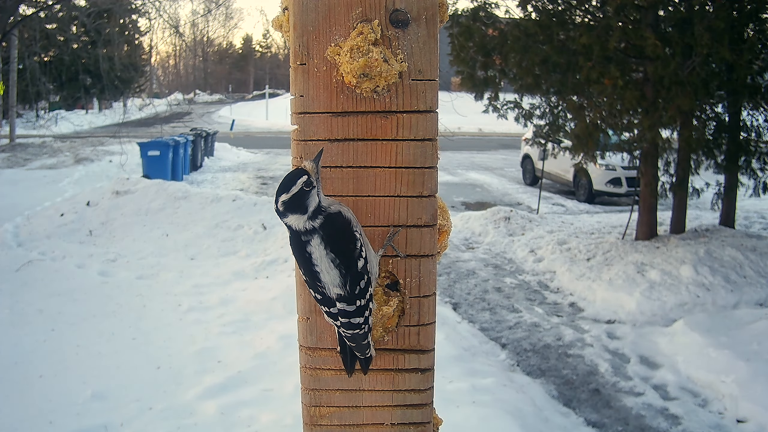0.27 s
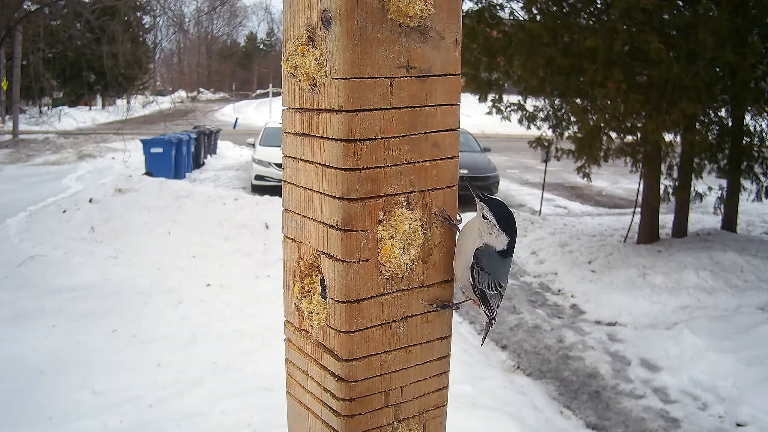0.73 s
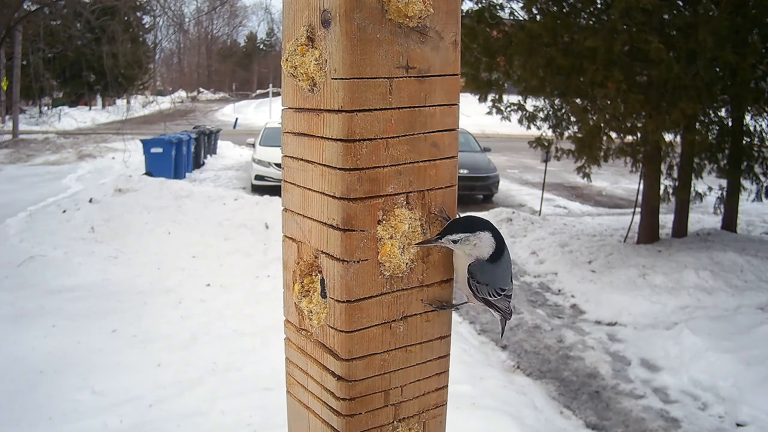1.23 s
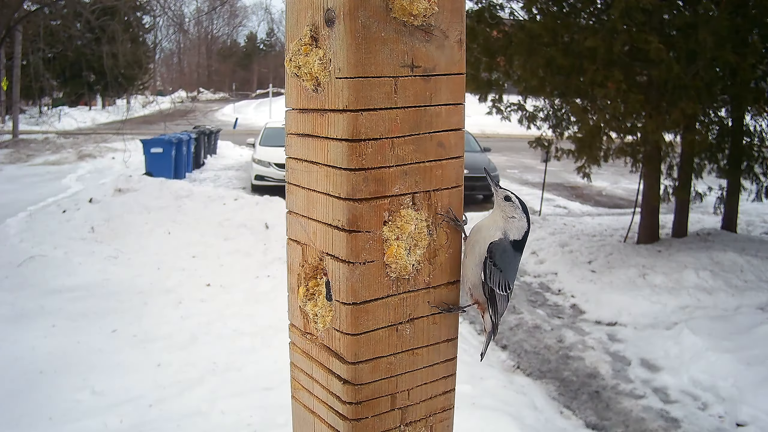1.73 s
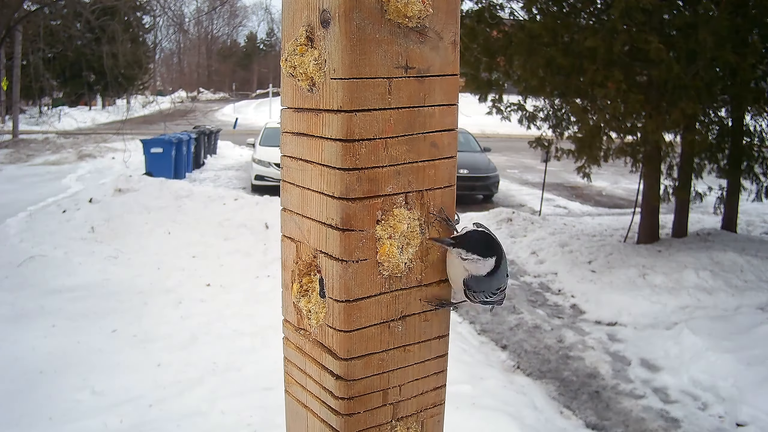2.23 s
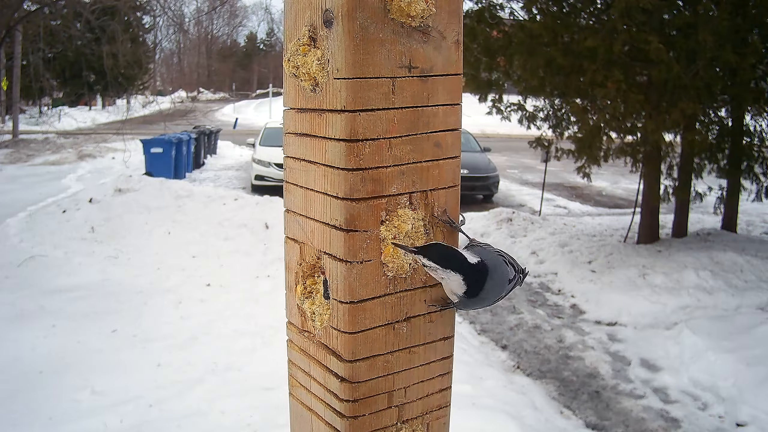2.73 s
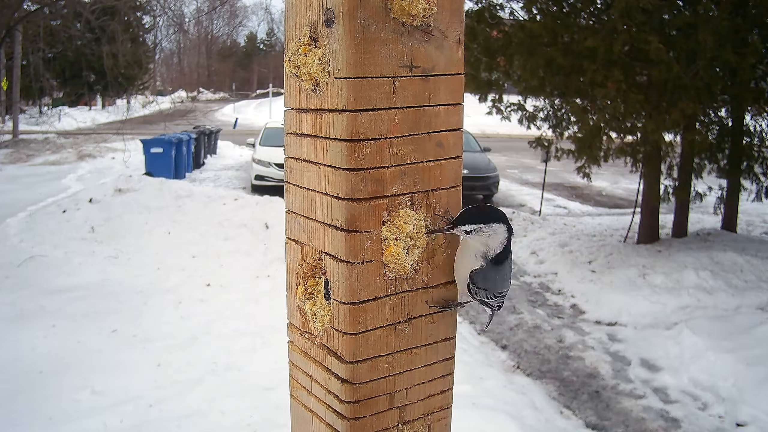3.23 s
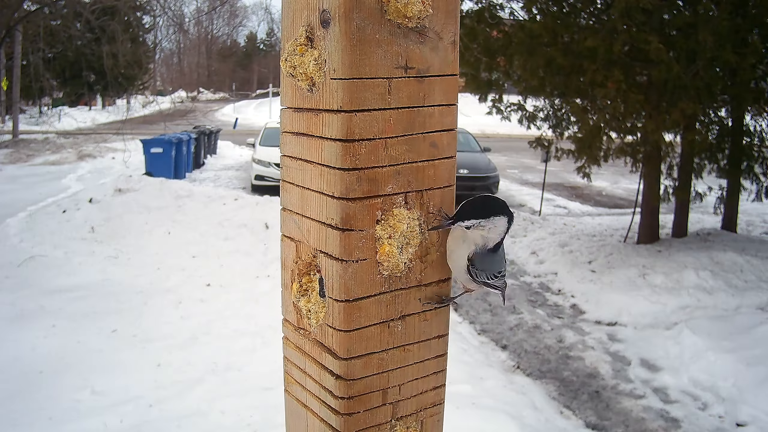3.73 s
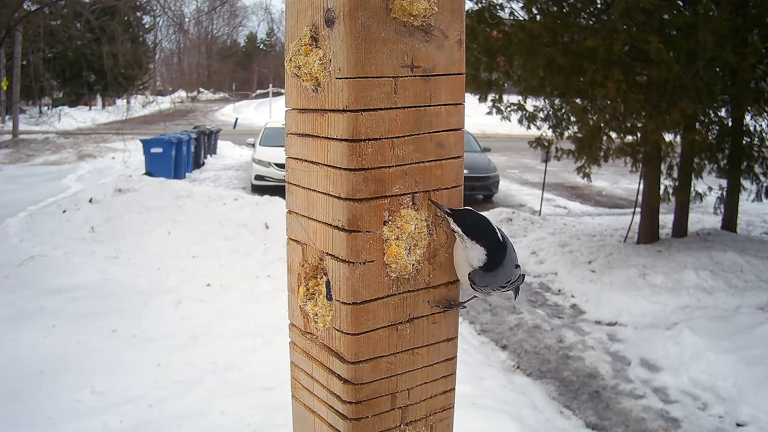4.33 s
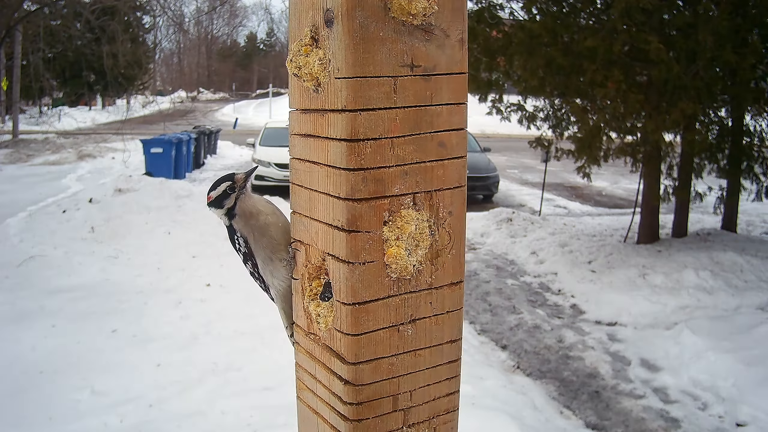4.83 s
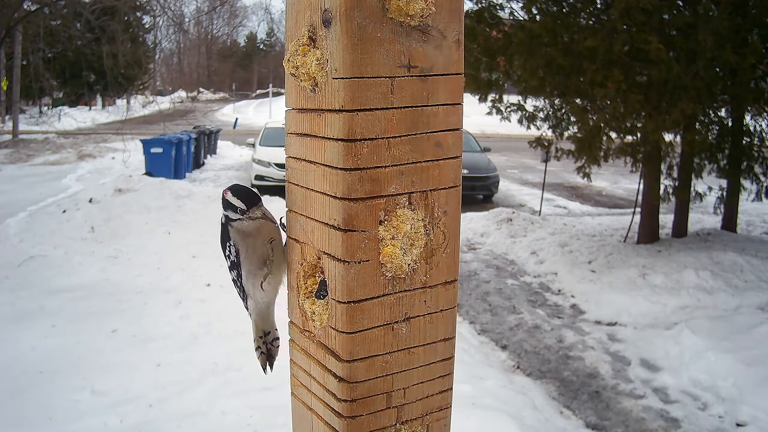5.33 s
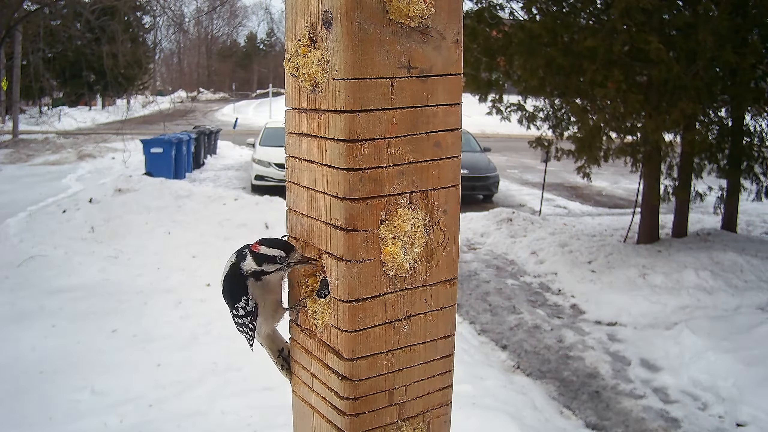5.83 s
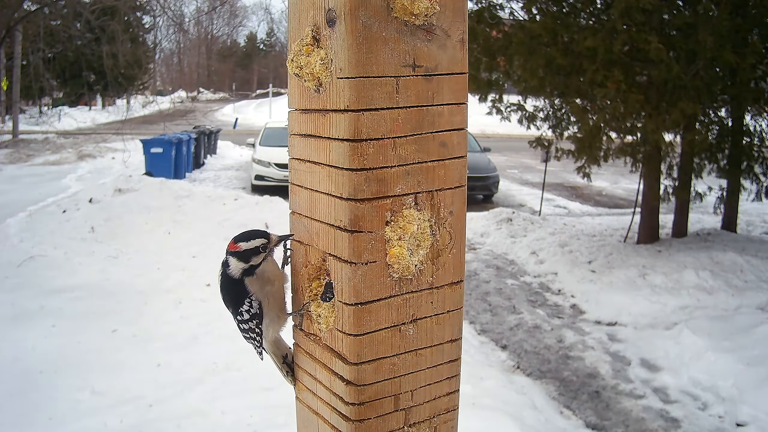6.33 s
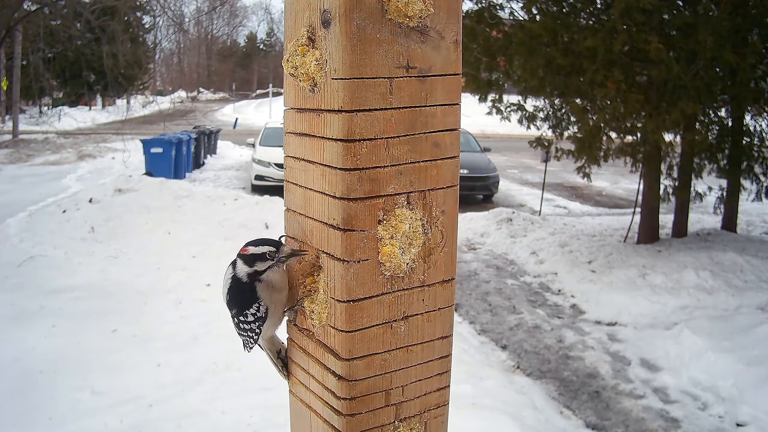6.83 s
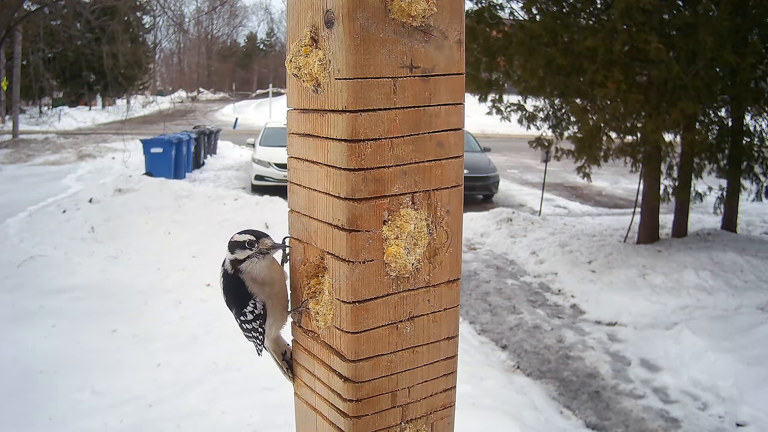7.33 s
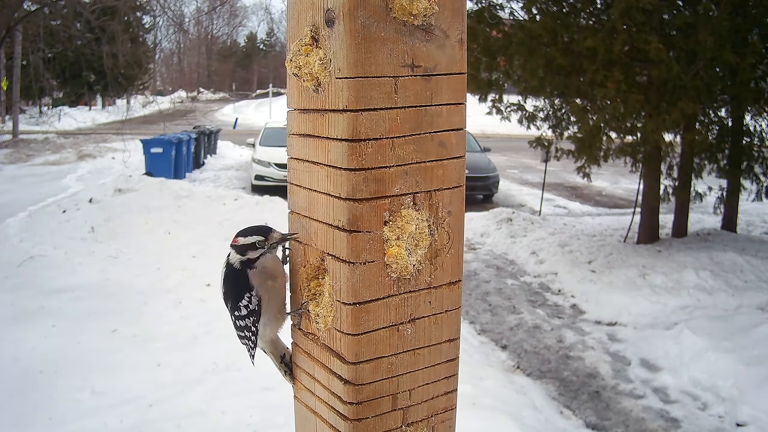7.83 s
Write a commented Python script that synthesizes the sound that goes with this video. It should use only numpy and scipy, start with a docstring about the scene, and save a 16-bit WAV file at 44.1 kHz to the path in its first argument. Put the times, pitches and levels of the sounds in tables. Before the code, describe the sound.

A small bird feeds at a wooden post in a yard, heard close up against an even background hiss. High chirps and one brief nasal call come first. Then about eight hard pecks ring the wood, getting louder, each with a little crackle of suet and seed, while the post hums softly. Light claw ticks, one more thin chirp and a short, clicking scrape of a bill follow.

```python
"""A nuthatch feeds at a wooden post in a snowy yard, over a steady outdoor hiss.
First comes a thin chirp, then the nuthatch's one short nasal note, then fainter chirps.
From 2.8 s its bill knocks suet out of the post in a run of mostly growing blows; the wood rings,
crumbs crackle, and the post hums low whenever a bird works on it. Claws and bill tick here and there.
Near 5 s a far tone swells and stops, one more chirp follows, and at 7.3 s the bill scrapes the hole."""
import sys
import numpy as np
from scipy import signal
from scipy.fft import rfft, irfft, next_fast_len
from scipy.io import wavfile

SR = 44100
rng = np.random.default_rng(int(sys.argv[2]) if len(sys.argv) > 2 else 0)


def dump(signal):
    """Clip the signal to [-1, 1] and save it as 16-bit WAV at the path in sys.argv[1]."""
    limited = np.clip(np.atleast_2d(signal).T, -1, 1)
    pcm = np.round(limited * 32767).astype(np.int16)
    wavfile.write(sys.argv[1], SR, pcm)


N = 356813
T = np.arange(N) / SR


# blows of the bill: t/s, strength/dB, extra knock/dB, extra clack/dB, extra tick/dB
BLOWS = [(2.799, -46.5, -12, -13, -10.5), (3.3794, -39, -13, 7.5, 4), (3.562, -37, -1.5, -11, 3),
         (3.696, -36, -2.5, -5.5, 10.5), (3.848, -25.5, -4.5, -6, -1), (4.015, -23.5, 0, 1, -3),
         (4.239, -23, 0.5, 3, -14.5), (4.643, -31, 6.5, 9, 18.5)]
# middles of the post's body, knock, clack, tick and top ranges: f/Hz
RANGE_CENTRES = [1000, 1700, 2400, 7400, 13000]
# the post's main tones: f/Hz, level/dB, t60/s (the time to fade by 60 dB)
POST_TONES = [(698.9, -16.5, 0.16), (820.6, 6.5, 0.1), (936.5, 6, 0.057), (1040, -7, 0.054),
              (1251, -15, 0.086), (1323, -16.5, 0.12), (1732, 3, 0.035), (1890, -16, 0.074),
              (2050, -16, 0.023), (2220, -4, 0.063), (2398, 5, 0.017), (2610, 1.5, 0.019), (2845, -5, 0.03),
              (3090, -18, 0.059), (5030, -13.5, 0.015), (7330, -8.5, 0.01), (7580, -9, 0.0067),
              (8600, -15.5, 0.014), (13920, -18, 0.021), (15200, -29, 0.11)]
# outline of its many weak, short tones: f/Hz, level/dB
WEAK_TONES = [(330, -40), (550, -9), (1000, -14), (1500, -16.5), (2400, -7), (3400, -23), (5000, -33.5),
              (7400, -28.5), (10000, -41), (15000, -35)]

def pecks(travel_s=0.0038, spread=0.18, weak_t60=0.024, detune=0.0012, swell_s=0.0093, count=110):
    """Each blow rings the post. High tones cross wood faster, so low ones arrive and build up last."""
    out, t = np.zeros(N), np.arange(SR // 6) / SR
    for s, strength_db, knock_db, clack_db, tick_db in BLOWS:
        # each blow wakes the main tones and its own pick of weak ones
        weak_hz = np.geomspace(WEAK_TONES[0][0], WEAK_TONES[-1][0], count)
        weak_hz *= 1 + 0.021 * rng.standard_normal(count)
        weak_db = 20 * np.log10(spectrum_at(weak_hz, WEAK_TONES))
        weak = np.column_stack([weak_hz, weak_db, weak_t60 * (2400 / weak_hz) ** 0.34])
        hz, db, t60 = np.vstack([POST_TONES, weak]).T[:, :, None]
        head_start = np.r_[np.zeros(len(POST_TONES)), rng.random(count)][:, None]
        # the spot and angle of the blow decide which ranges stand out
        colour_db = np.interp(np.log(hz), np.log(RANGE_CENTRES), [0, knock_db, clack_db, tick_db, 0])
        delay = travel_s * (1000 / hz) ** 1.39
        arrival = .5 + .5 * np.tanh((t - delay) / (2 * spread * delay))
        swell = 1 - np.exp(-(t / (swell_s * (900 / hz) ** 3)) ** 2)
        loudness = undb(strength_db + db + colour_db) * arrival * swell * fade(t - delay, t60)
        cycles = hz * (1 + detune * rng.standard_normal(hz.shape)) * t + head_start
        add(out, s, np.sum(loudness * np.sin(2 * np.pi * cycles), axis=0))
    return out


def crumbs(level_db=-28, t60=0.22, hz=7000, width_hz=10000, grit_db=3.5):
    """After each blow, crushed suet and seed crackle for a moment."""
    out, t = np.zeros(N), np.arange(SR // 6) / SR
    for s, strength_db, _, _, tick_db in BLOWS:
        grit = undb(grit_db * wander(720, len(t))) * band(hz, width_hz, len(t))
        add(out, s, undb(strength_db + level_db + tick_db * 0.36) * grit * fade(t, t60))
    return out


# spells of a bird working or shifting on the post: start t/s, length/s, level/dB, bobbing depth/dB
BIRD_SPELLS = [(.79, .66, -80.5, 4), (2.81, .21, -65.5, 2), (3.04, .3, -75.5, 1),
               (3.386, 0.37, -57.5, -0.5), (3.676, 0.354, -53, 1), (4.2, .33, -62, 0.5),
               (4.648, 0.11, -57.5, -0.5), (5.728, 0.2, -65.5, 1), (5.97, .34, -75, 4),
               (6.6, 0.16, -66.5, 3), (6.947, .49, -77, 4.5), (7.66, .25, -66, -0.5),
               (7.97, 0.11, -78.5, 3)]

def shaking(rest_db=-92.5, bob_hz=5.57, attack_s=0.027, t60=0.19, jolt_db=-33, jolt_t60=0.86):
    """How hard the post shakes, in dB: a bobbing bird rocks it and each blow jolts it."""
    power = undb(rest_db) ** 2
    for s, length, db, depth_db in BIRD_SPELLS:
        bob_db = -depth_db * np.cos(2 * np.pi * bob_hz * (T - s))
        power += (undb(db + bob_db) * envelope(s, length, attack_s, t60)) ** 2
    for s, strength_db, *_ in BLOWS:
        power += (undb(strength_db + jolt_db) * envelope(s, 0, attack_s, jolt_t60)) ** 2
    return 10 * np.log10(power)


# low tones of the swaying post: f/Hz, width/Hz, level/dB
HUM_TONES = [(54.5, 6, 0.5), (78, 13, -11.5), (104, 12.5, -6.5), (164, 9.1, -5), (333, 10.2, -14)]

def post_hum(level_db=-1, waver_db=2.5, rumble_db=-13, brighten=0.18):
    """The shaken post hums its lowest tones; harder shaking brings out the upper ones."""
    shake_db, hum = shaking(), 0
    for hz, width_hz, db in HUM_TONES:
        tone = np.sin(phase_of(hz + width_hz / 3 * wander(22)))
        tilt_db = brighten * (shake_db - shake_db.max()) * np.log2(hz / HUM_TONES[0][0])
        hum += undb(db + tilt_db + waver_db * wander(14)) * tone
    rumble = signal.sosfilt(signal.butter(2, 220, fs=SR, output="sos"), band(60, 98))
    return (hum + undb(rumble_db) * rumble) * undb(shake_db + level_db)


# course of the nuthatch's note: t/s, f/Hz, level/dB
NASAL_NOTE = [(1.088, 730, -66), (1.098, 741, -45), (1.106, 758, -38), (1.114, 802, -29.5),
              (1.121, 830, -34.5), (1.127, 834, -41), (1.134, 790, -66)]
# how its throat shapes the overtones: f/Hz, level/dB
THROAT_SHAPE = [(800, -23), (1600, 0.5), (2400, -2), (3200, -1.5), (4000, -17), (4800, -18.5), (5600, -18),
                (6400, -23), (8000, -29), (11000, -34.5)]

def nasal_note(jitter=0.0128, rasp_db=-23, ring_db=-6, ring_lag_s=0.012):
    """A short rising note, rich in overtones; a steady tone near 820 Hz rings on a little after it."""
    pitch = curve(NASAL_NOTE) * (1 + jitter * wander(1200))
    effort = undb(curve(NASAL_NOTE, 2)) * (T > NASAL_NOTE[0][0]) * (T < NASAL_NOTE[-1][0])
    phase = phase_of(pitch)
    voice = sum(spectrum_at(k * pitch, THROAT_SHAPE) * np.sin(k * phase) for k in range(1, 14))
    rasp = undb(rasp_db) * band(4000, 4000)
    late_effort = np.interp(T - ring_lag_s, T, effort ** 2 / effort.max())
    ring = undb(ring_db) * late_effort * np.sin(2 * np.pi * POST_TONES[1][0] * T)
    return effort * (unit(voice) + rasp) + ring


# thin bird notes: middle t/s, length of the loud part/s, f/Hz, level/dB, roughness from 0 to 1
BIRD_CHIRPS = [(0.789, 0.033, 7410, -39.5, 0.12), (1.518, .038, 6230, -52, 0.43),
               (1.589, 0.043, 6320, -51, .33), (1.673, 0.034, 6370, -50.5, 0.33),
               (1.748, 0.046, 6230, -56.5, .35), (1.822, .047, 6700, -61, 0.44),
               (1.901, .05, 5720, -53.5, 0.2), (2.071, .24, 3210, -69.5, 0.84),
               (6.261, .052, 7550, -40.5, 0.12)]

def chirps(arch=0.035, jitter=0.085, flutter_db=1.5, rasp_db=3, upper_ratio=1.145, upper_db=1):
    """Both sides of a bird's voice box whistle up and down; roughness shakes the pitch and adds rasp."""
    out = np.zeros(N)
    for s, length, hz, db, rough in BIRD_CHIRPS:
        size = int(length * 1.4 * SR)  # room for the quiet ends
        position = np.linspace(-1, 1, size)
        note = rough * undb(rasp_db) * band(0.9 * hz, width_hz=2200, size=size)
        bend = 1 - arch * position * (position - .8)
        # the upper voice grows with roughness
        for voice_hz, gain in ((hz, 1), (hz * upper_ratio, rough * undb(upper_db))):
            pitch = voice_hz * (bend + jitter * rough * wander(1500, size))
            flutter = undb(flutter_db * wander(254, size))
            note += np.sqrt(2) * gain * flutter * np.sin(phase_of(pitch))
        swell = np.cos(np.pi * position / 2) ** 2
        add(out, s - size / SR / 2, undb(db) * swell * note)
    return out


# claws and bill tips touching wood and seed: t/s, level/dB
TOUCHES = [(1.116, -44), (2.125, -50), (2.951, -48), (2.979, -51), (3.130, -50), (4.138, -50), (4.816, -49),
           (5.674, -52), (6.682, -49), (7.3475, -48), (7.386, -37), (7.387, -33.5)]

def ticks(t60=0.011, wood_db=-16):
    """Small hard touches make a bright snap with a little wood sound under it."""
    out, t = np.zeros(N), np.arange(SR // 16) / SR
    for s, db in TOUCHES:
        snap = band(hz=10000, width_hz=3500, size=len(t))
        wood = undb(wood_db) * band(hz=3600, width_hz=500, size=len(t))
        add(out, s, undb(db) * (snap + wood) * fade(t, t60))
    return out


# strokes of the bill in the suet hole: hardest push t/s, level/dB, t60/s
STROKES = [(7.347, -59, .1), (7.387, -53, 0.14)]
# tones of the wood around the hole: f/Hz, width/Hz, level/dB
HOLE_TONES = [(765, 150, -10), (1600, 920, -8), (3600, 110, -5), (4130, 200, -9), (11100, 1800, -1)]

def scrape(grit_db=4, rise_db_per_s=900):
    """The bill tip slips unevenly and rings the wood; each stroke presses harder, then lets go."""
    push = 0
    for s, db, t60 in STROKES:
        press = undb(db + rise_db_per_s * np.clip(T - s, -1, 0))
        push += press * fade(np.maximum(T - s, 0), t60)
    slips = push * undb(grit_db * wander(500))
    return slips * sum(undb(db) * band(hz, width_hz) for hz, width_hz, db in HOLE_TONES)


def far_tone(end_s=5.07, length_s=0.17, end_hz=716, glide_hz_per_s=300, end_db=-56.5, db_per_s=125):
    """A faint, far tone swells as it slides up, then stops."""
    t = np.clip(T - end_s, -2 * length_s, 0)
    tone = np.sqrt(2) * np.sin(phase_of(end_hz + glide_hz_per_s * t))
    swell = undb(end_db + db_per_s * t)
    return tone * swell * envelope(end_s - length_s, length_s, attack_s=.02, t60=0.078)


# tone colour of the outdoor hiss: f/Hz, level/dB
HISS_SHAPE = [(18, -40), (30, -9), (58, -16), (102, -20), (299, -7), (359, -9.5), (591, -5.5), (709, -4),
              (787, -6), (1170, -5), (2830, -7), (4090, -7.5), (4420, -8), (13300, -12), (15500, -10.5)]
# far tyres on the road: t/s, level/dB
TYRES = [(0, -68), (.4, -69), (.75, -77), (2.5, -89), (8.09, -83)]
# a brief dip in the background, which is a little louder afterwards: t/s, level change/dB
BACKGROUND_DIP = [(.70, 4.5), (.745, -3.5), (.768, -26), (.771, 6)]

def outdoor_air(hiss_db=-64, swell_db=0.77, drone_db=-79, waver_db=2.5):
    """An even hiss with a faint wavering drone, far tyres and the far tone; all dip briefly together."""
    hiss = coloured(lambda f: spectrum_at(f, HISS_SHAPE), N)
    hiss *= undb(hiss_db + swell_db * wander(2.934))
    drone = undb(drone_db + waver_db * wander(3.04)) * band(hz=715, width_hz=35)
    tyres = undb(curve(TYRES)) * band(hz=1020, width_hz=960)
    return (hiss + drone + tyres + far_tone()) * undb(curve(BACKGROUND_DIP))


def yard_echo(sound, echo_db, t60, first_s=0.0035):
    """Add short, scattered echoes from the wall, post and trees."""
    t = np.arange(SR // 2) / SR
    echoes = rng.standard_normal(len(t)) ** 3 * (t > first_s) * fade(t, t60)
    return sound + undb(echo_db) * signal.fftconvolve(sound, echoes / np.linalg.norm(echoes))[:N]


def undb(db):
    """Turn decibels into a gain, a number to multiply by."""
    return 10 ** (np.asarray(db) / 20)


def unit(x):
    """Scale a sound to an average strength (rms) of 1."""
    return x / np.sqrt(np.mean(x ** 2))


def fade(t, t60):
    """Die away by 60 dB every t60 seconds."""
    return undb(-60 * t / t60)


def envelope(start_s, length_s, attack_s, t60):
    """Rise, hold and fade of one event, at most 1."""
    t = T - start_s
    return np.clip(t / attack_s, 0, 1) * fade(np.maximum(t - length_s, 0), t60)


def phase_of(hz):
    """The angle a wave has turned through as its pitch changes."""
    return 2 * np.pi * np.cumsum(hz) / SR


def curve(rows, column=1):
    """Join a table's rows by straight lines in time."""
    rows = np.asarray(rows)
    return np.interp(T, rows[:, 0], rows[:, column])


def spectrum_at(hz, points):
    """Look up gains in a table of f/Hz, level/dB."""
    f, db = np.transpose(points)
    return undb(np.interp(np.log(hz + 1), np.log(f), db))


def coloured(gain_at, size):
    """Noise with a given gain at each frequency, strength 1."""
    padded = next_fast_len(size, True)
    f = np.fft.rfftfreq(padded, 1 / SR) + 1e-6
    return unit(irfft(rfft(rng.standard_normal(padded)) * gain_at(f), padded)[:size])


def band(hz, width_hz, size=N):
    """Noise gathered around one pitch, strength 1."""
    return coloured(lambda f: 1 / np.hypot(1, (f * f - hz * hz) / (f * width_hz)), size)


def wander(rate, size=N):
    """A smooth random drift of about 1 either way, with rate new values a second."""
    steps = np.arange(size) * rate / SR
    targets = rng.standard_normal(size // 8)
    eased = steps - np.sin(2 * np.pi * steps) / (2 * np.pi)
    return np.interp(eased, np.arange(len(targets)), targets)


def add(track, s, sound):
    """Mix a sound in at time s."""
    i = int(s * SR)
    track[i:i + len(sound)] += sound[:N - i]


def scene():
    """The close pecks have little echo, the farther chirps have more; both channels are the same."""
    taps = yard_echo(pecks() + crumbs() + ticks() + scrape(), echo_db=-15.5, t60=0.12, first_s=.008)
    note = yard_echo(nasal_note(), echo_db=-14.5, t60=0.13)
    far_birds = yard_echo(chirps(), echo_db=-7, t60=0.19)
    return np.tile(taps + note + far_birds + post_hum() + outdoor_air(), (2, 1))


def record(dry, top_hz=15550):
    """Cut away the very highest treble."""
    return signal.sosfilt(signal.ellip(10, .2, 70, top_hz, fs=SR, output="sos"), dry)


dry = scene()
out = record(dry)
dump(out)
```